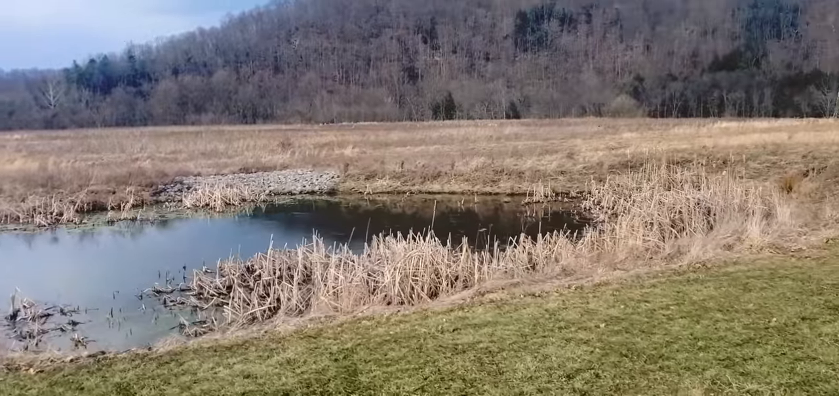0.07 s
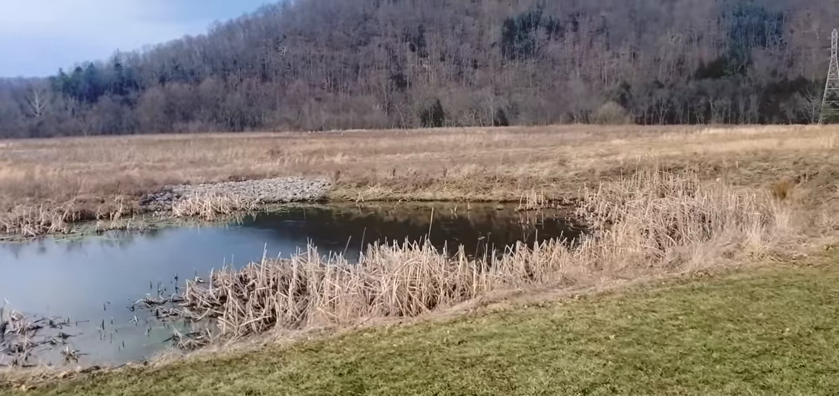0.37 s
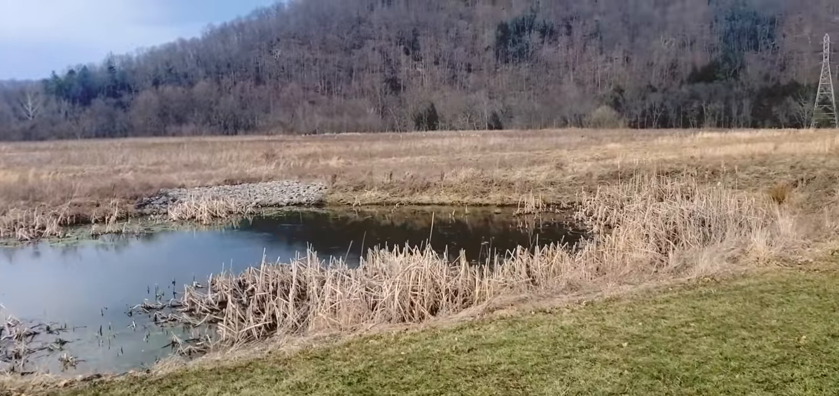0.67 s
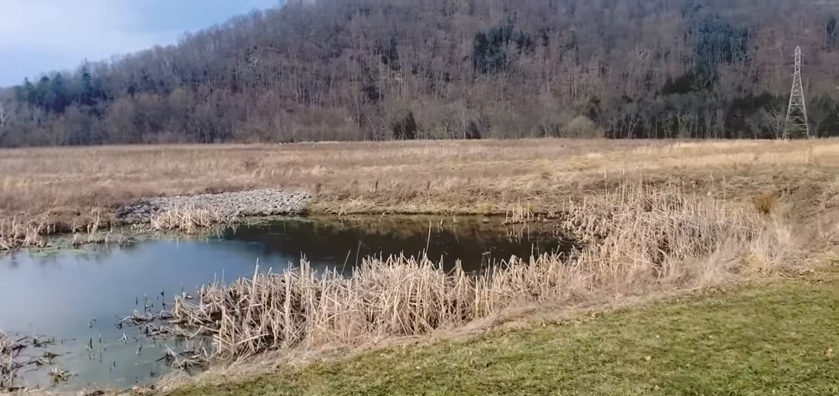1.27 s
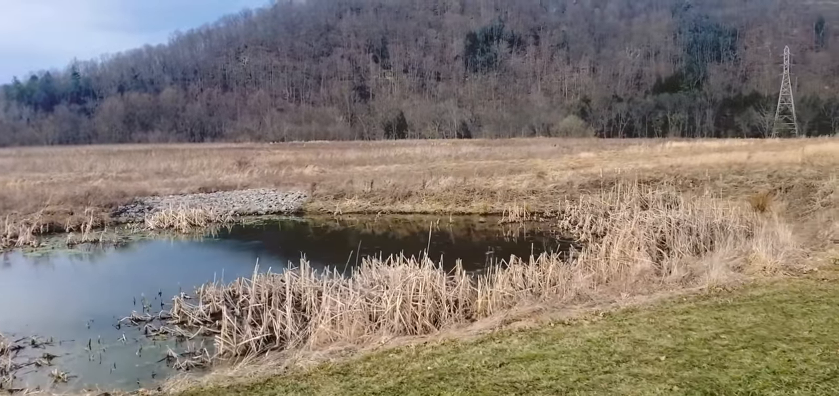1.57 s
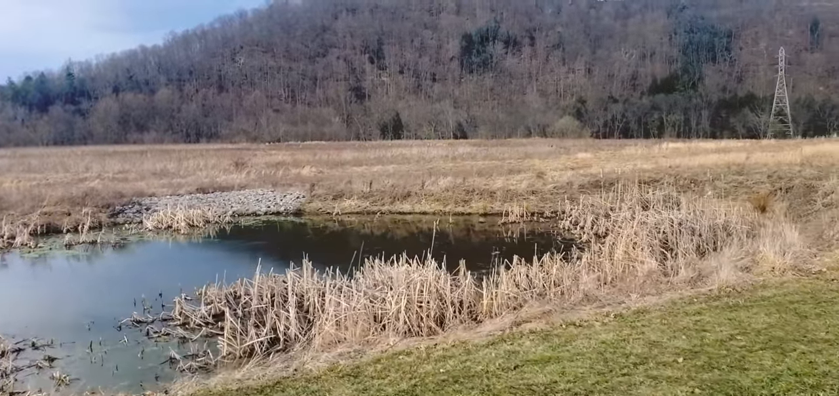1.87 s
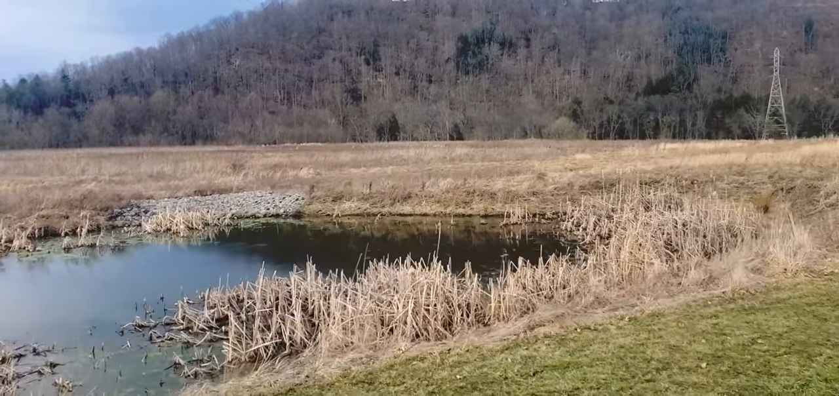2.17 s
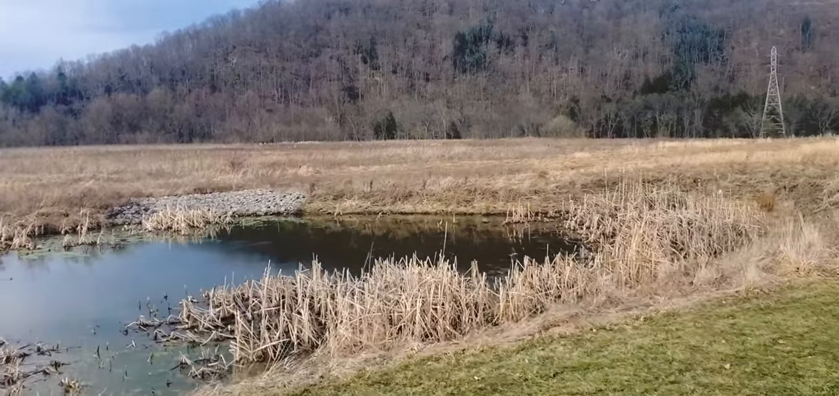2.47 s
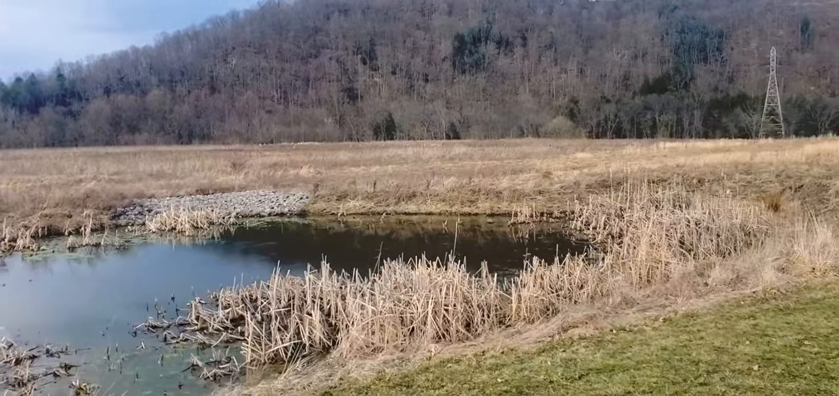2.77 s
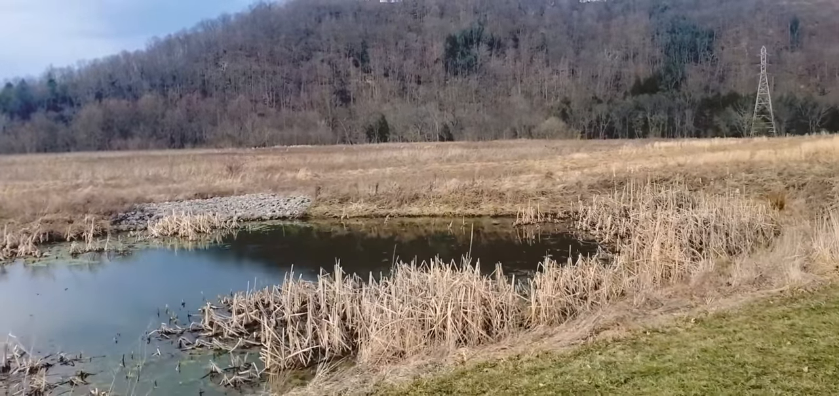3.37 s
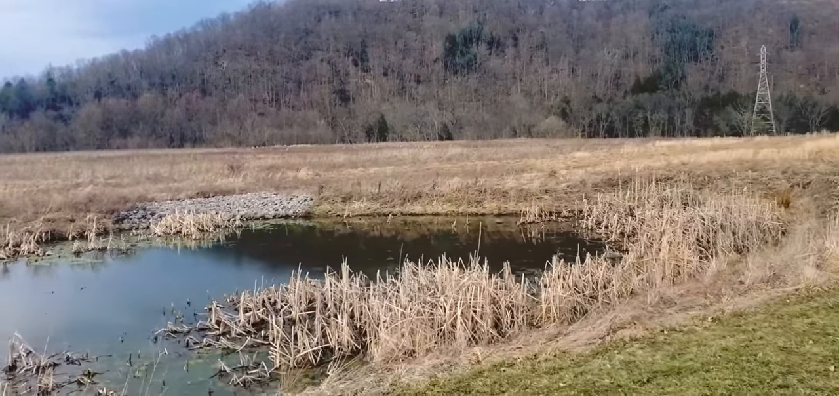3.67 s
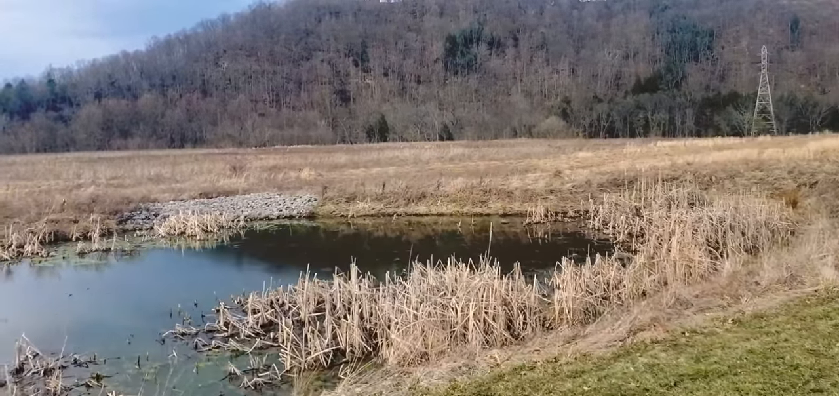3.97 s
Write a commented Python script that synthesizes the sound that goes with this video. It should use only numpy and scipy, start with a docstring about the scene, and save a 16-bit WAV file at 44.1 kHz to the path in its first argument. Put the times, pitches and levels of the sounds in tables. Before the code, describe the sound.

Many small frogs peep throughout around a pond, their short, high, rising whistles overlapping a distant chorus and echoing faintly. Soft, lower frog quacks come now and then. One frog trills briefly at about 0.9 seconds, and the loudest peeps fall around 1.5 to 1.7 seconds. Light wind rumbles on the microphone over a faint hiss, thumping hardest near 2.7 and 3.6 seconds.

```python
"""Spring peepers call round a reedy pond. From the start, rising whistles from the near bank overlap a
distant chorus and wood frogs quack now and then, over a faint hiss that swells and fades and a few dry
ticks. A low-voiced peeper soon joins in, and just before one second one frog gives a short trill.
Light gusts buffet the microphone throughout and thump hardest in the second half.
Every call scatters off the reeds and echoes faintly from a wooded hill."""
import sys
import numpy as np
from scipy import signal
from scipy.fft import rfft, irfft
from scipy.io import wavfile
from scipy.ndimage import map_coordinates

SR = 44100
rng = np.random.default_rng(int(sys.argv[2]) if len(sys.argv) > 2 else 0)


def to_wav(s):
    """Save 16-bit WAV."""
    ch = np.atleast_2d(s).T  # columns
    pcm = np.round(np.clip(ch, -1, 1) * 32767)  # PCM
    wavfile.write(sys.argv[1], SR, pcm.astype(np.int16))


N = 176400  # 4 seconds
PEEP_PAN_DB = 2.5  # the peepers are louder on the left


def undb(db):
    """Turn decibels into a number to multiply a sound by."""
    return 10 ** (np.asarray(db) / 20)


def unit(x):
    """Scale a sound to an average (rms) level of 1."""
    return x / np.sqrt(np.mean(x ** 2) + 1e-20)


def curve(rows):
    """Loudness over time, drawn through (time_s, level_db) points."""
    return undb(np.interp(np.arange(N) / SR, *np.array(rows).T))


def drift(rate_hz, size):
    """A smooth random wobble, mostly between -1 and 1."""
    position = np.arange(size) / SR * rate_hz
    return map_coordinates(rng.standard_normal(512), [position], order=2, mode="wrap")


def add(out, start_s, sound, pan_db=0):
    """Mix a sound into both channels; a positive pan_db makes the left louder."""
    sound = sound * undb(np.array([[pan_db], [-pan_db]]) / 2)
    offset = int(start_s * SR)
    first, end = max(offset, 0), min(offset + sound.shape[1], N)
    if end > first:
        out[:, first:end] += sound[:, first - offset:end - offset]


def noise(colour, width):
    """Stereo noise shaped by (pitch_hz, level_db) points; it falls away steeply beyond them."""
    hz, db = np.array(colour, float).T
    log_hz = np.log(np.arange(N // 2 + 1) * SR / N + 1e-3)
    beyond = np.abs(log_hz - np.clip(log_hz, np.log(hz[0]), np.log(hz[-1])))
    gain = undb(np.interp(log_hz, np.log(hz), db) - 50 * beyond)
    middle, side = (unit(irfft(rfft(rng.standard_normal(N)) * gain, N)) for _ in range(2))
    return middle + width * side * np.array([[1], [-1]])


def noise_band(size, pitch_hz, width_hz):
    """Stereo noise passed twice through a filter that favours one pitch."""
    peak = signal.iirpeak(pitch_hz, pitch_hz / width_hz, fs=SR)
    return signal.lfilter(*peak, signal.lfilter(*peak, rng.standard_normal((2, size))))


def scatter(sound, fade_s, width):
    """A dense cloud of echoes that dies away by 60 dB in fade_s."""
    t = np.arange(SR) / SR
    build_up = 1 - np.exp(-t / 0.0059)
    middle, side = rng.standard_normal((2, SR)) * np.exp(-np.log(1000) * t / fade_s) * build_up
    tail = unit(middle + width * side * np.array([[1], [-1]])) / np.sqrt(SR)
    return signal.fftconvolve(sound.mean(0)[None], tail, axes=1)[:, :N]


def open_air():
    """A soft rush of air, a faint hiss and a higher sheen, each swelling and fading."""
    # tone of each layer: pitch_hz, level_db
    air_colour = [(120,-16),(260,-3.5),(420,-2),(600,0.5),(960,-6.5),(1250,-2.5),(1650,-5.5),(2000,-11),(2600,-1.5)]
    hiss_colour = [(1800,7.5),(3200,4),(3700,3.5),(4400,1.5),(7000,0.5),(8200,-15.5)]
    sheen_colour = [(7500,-1.5),(9000,-6),(11500,-2),(13500,-2.5),(15500,2.5)]
    # rise and fall of each layer: time_s, level_db
    air_level = [(0,-58.5),(.45,-60),(.9,-58),(1.3,-60),(1.5,-61.5),(1.62,-67),(1.85,-57.5),(2.15,-57.5),(2.45,-61),(2.8,-64),(3.1,-62),(3.35,-62),(3.6,-64.5),(4,-64)]
    hiss_level = [(0.0, -73), (0.13, -73.5), (0.31, -70), (0.33, -75), (0.68, -82), (0.78, -66.5),
                  (0.81, -73.5), (0.96, -64), (1.02, -71), (1.71, -81), (1.9, -74), (2.19, -69),
                  (2.28, -74.5), (2.71, -84), (2.75, -73), (3.1, -71), (3.2, -79.5), (4.0, -72.5)]
    sheen_level = [(0.0, -74), (0.17, -77), (0.28, -71.5), (0.44, -81), (0.69, -83), (0.75, -64),
                   (0.87, -70.5), (0.91, -60), (1.06, -74), (1.49, -77.5), (1.5, -71), (1.54, -80.5),
                   (1.68, -82.5), (2.06, -70.5), (2.7, -82), (2.76, -71.5), (3.29, -79), (4.0, -73.5)]
    out = undb(-1.5 + drift(12, N)) * curve(air_level) * noise(air_colour, width=1)
    hiss = undb(4.5 + 1.83 * drift(25.51, N)) * curve(hiss_level) * noise(hiss_colour, width=0.98)
    sheen = undb(1 + 0.79 * drift(21.23, N)) * curve(sheen_level) * noise(sheen_colour, width=0.98)
    add(out, 0, hiss, pan_db=-4)
    add(out, 0, sheen, pan_db=1)
    return out


def sizzles():
    """Faint, thin bands of noise that fade in and out."""
    # sizzles: start_s, length_s, pitch_hz, level_db
    bands = [(0.604,0.035,4900,-71),(1.749,0.5,4340,-72),(2.262,0.58,5120,-74),(2.279,0.54,3300,-62)]
    out = np.zeros((2, N))
    for start_s, length_s, pitch_hz, level_db in bands:
        size = int(length_s * SR)
        band = noise_band(N, pitch_hz, width_hz=410)[:, :size]
        add(out, start_s, undb(level_db) * unit(band) * signal.windows.tukey(size))
    return out


def ticks():
    """Dry snaps of noise that die within a few milliseconds."""
    # ticks: start_s, pitch_hz, width_hz, level_db
    snaps = [(0.313,1100,2200,-39.5),(.313,4970,3000,-52),(.365,8900,9000,-55.5),(0.415,6900,4000,-60),(1.503,11600,4970,-52.5),(2.507,10000,5000,-59.5),(2.817,4600,2000,-53),(3.399,11000,7000,-63),(3.467,7040,2800,-52),(3.486,13800,4020,-65),(3.5,6540,4000,-53)]
    out = np.zeros((2, N))
    t = np.arange(SR // 30) / SR
    fade = np.exp(-t / 0.0018)
    for start_s, pitch_hz, width_hz, level_db in snaps:
        add(out, start_s, undb(level_db) * fade * unit(noise_band(len(t), pitch_hz, width_hz)))
    return out


def wind():
    """Wind on the microphone: a deep rumble, a flutter above it and single swirls of air that thump."""
    # tone of each layer: pitch_hz, level_db
    rumble_colour = [(12, -31), (20, -9.5), (51, 6), (71, 4), (89, 1.5), (152, -15.5), (300, -37),
                     (390, -60), (660, -120)]
    flutter_colour = [(70,-17),(115,10),(180,2.5),(290,-5.5),(420,-15),(800,-25.5),(1500,-47)]
    # rise and fall of the gusts: time_s, level_db
    rumble_level = [(0,-45.5),(.55,-47),(.95,-41.5),(1.12,-43.5),(1.28,-35),(1.42,-44),(1.56,-39.5),(1.8,-45.5),(2.05,-35.5),(2.25,-44.5),(2.45,-40.5),(2.75,-42.5),(2.98,-38),(3.2,-40),(3.32,-49),(3.47,-33.5),(3.54,-40),(3.7,-37.5),(4.0,-41)]
    flutter_level = [(0,-61.5),(.62,-64.5),(.85,-54),(1.1,-61.5),(1.3,-52),(1.5,-52),(1.62,-54.5),(1.75,-67.5),(2.05,-48.5),(2.2,-53),(2.45,-48.5),(2.86,-44.5),(2.92,-49),(3.0,-46.5),(3.13,-55),(3.39,-58),(3.55,-46.5),(3.63,-41.5),(3.85,-45),(4.0,-48)]
    # swirls hitting the microphone: start_s, length_s, pitch_hz, level_db
    swirls = [(0.394,.05,44.7,-29),(.90,0.077,62,-30),(1.21,.06,58,-26.5),(1.265,0.076,104.6,-30),(1.97,0.039,124,-33),(2.055,0.056,110.6,-27.5),(2.425,0.044,270,-41),(2.555,0.043,130,-32.5),(2.595,0.047,237.3,-39.5),(2.69,0.039,62.8,-17.5),(2.79,0.067,90.3,-26.5),(2.825,0.049,249.3,-35),(2.835,0.051,94.4,-27.5),(2.965,0.057,158.7,-33),(2.968,0.049,561,-42.5),(3.58,0.046,122,-25.5),(3.62,0.045,75,-17.5),(3.615,0.071,267,-38),(3.67,0.077,230.7,-35),(3.685,0.054,98.3,-22.5),(3.77,0.075,259,-33.5)]
    out = undb(1) * curve(rumble_level) * noise(rumble_colour, width=0.72)
    out += undb(-2.5 + 4.1 * drift(30, N)) * curve(flutter_level) * noise(flutter_colour, width=1.45)
    for start_s, length_s, pitch_hz, level_db in swirls:
        size = int(length_s * SR)
        hz = pitch_hz * (1 + 0.22 * drift(pitch_hz, size))
        phase = 2 * np.pi * np.cumsum(hz) / SR
        lead_rad = drift(44, size) * np.array([[1], [-1]])  # left and right slip out of step
        thump = undb(level_db) * np.hanning(size) * np.sin(phase + lead_rad)
        add(out, start_s, thump, pan_db=2 * rng.standard_normal())
    return out


def whistle(hz, swell_db=0):
    """A peeper's voice: an almost pure tone that follows a pitch curve and wavers a little."""
    fade_in_s, fade_out_s = 0.023, 0.043
    size = len(hz)
    t = np.arange(size) / SR
    fade_in = np.sin(np.pi / 2 * np.minimum(t / fade_in_s, 1)) ** 2
    fade_out = np.sin(np.pi / 2 * np.minimum(t[::-1] / fade_out_s, 1))
    lead_rad = 0.44 + 0.39 * rng.standard_normal()  # the wave usually reaches the left side first
    wavering_hz = hz * (1 + 0.0023 * drift(61, size))
    phase = 2 * np.pi * np.cumsum(wavering_hz) / SR + np.array([[lead_rad], [0]])
    level_db = swell_db * np.linspace(-.5, .5, size) + 2 * drift(55.3, size)
    return fade_in * fade_out * undb(level_db) * np.sin(phase)


def peep(length_s, from_hz, to_hz):
    """One whistle that slides between two pitches, more slowly towards its end."""
    progress = np.linspace(0, 1, int(length_s * SR))
    slide = progress + 0.199 * progress * (1 - progress)
    return whistle(from_hz + (to_hz - from_hz) * slide)


def far_chorus():
    """Many distant peepers giving rising whistles at random."""
    calls_per_s, rise_hz, level_db = 26, 291.5, -57
    out = np.zeros((2, N))
    for k in range(int(calls_per_s * (N / SR + .2))):
        timing, pitch, length, loudness = rng.uniform(-1, 1, 4)
        hz = 2600 + 190 * pitch
        call = undb(1.7 * loudness) * peep(.14 + 0.0416 * length, hz, hz + rise_hz)
        add(out, (k + timing) / calls_per_s - .15, call, PEEP_PAN_DB)
    return undb(level_db) * unit(out)


def quack(length_s, pitch_hz, throat_hz):
    """A short, rough note that rises and falls; the throat favours overtones near throat_hz."""
    throat_width_hz, roughness_db = 275, 4
    size = int(length_s * SR)
    arch = np.sin(np.pi * np.linspace(0, 1, size) ** 0.85)
    hz = pitch_hz * (1 + 0.1 * (arch - 1) + 0.047 * drift(336, size))
    phase = 2 * np.pi * np.cumsum(hz) / SR
    voice = undb(-16) * np.sin(2 * phase)  # the body gives off a tone at twice the pitch
    for k in range(1, 8):
        throat = (1 + ((k * hz - throat_hz) / throat_width_hz) ** 2) ** -2
        voice += throat * undb(roughness_db * drift(262, size)) * np.sin(k * phase)
    return unit(voice * arch ** 2)


def wood_frogs():
    """Single quacks from deep in the reeds, blurred by quick echoes."""
    # quacks: start_s, length_s, pitch_hz, throat_hz, level_db, pan_db
    calls = [(0.131,0.028,341.5,1390,-48,6.5),(0.548,0.037,386,1350,-50,3),(0.61,0.042,407.5,1845,-52.5,13),(0.63,0.025,380,1360,-48,2),(1.096,0.058,308,1230,-53.5,8),(1.403,0.022,354,1380,-62,-7),(1.433,0.03,318.7,1276,-48,5),
             (1.793,0.037,365.6,1520,-58.5,-8),(2.279,0.023,385,1465,-49,4),(2.347,0.046,377,1307,-46.5,4),(2.602,0.022,371.5,1065,-49,0),(2.958,0.043,369.3,1440,-51,0),(3.014,.04,365,1450,-65,4),
             (3.25,0.023,317,1250,-47.5,9.5),(3.575,.036,396.6,1480,-51,4)]
    out = np.zeros((2, N))
    for start_s, length_s, pitch_hz, throat_hz, level_db, pan_db in calls:
        add(out, start_s, undb(level_db) * quack(length_s, pitch_hz, throat_hz), pan_db)
    return out + undb(-4.5) * scatter(out, fade_s=0.11, width=1.6)


def low_peeper():
    """Long, low whistles that sag into the note, then climb and grow louder."""
    # low whistles: start_s, length_s, low_hz, end_hz, level_db
    calls = [(0.66,.17,2310,2380,-56),(0.808,0.18,2256,2430,-55.5),(1.653,0.25,2297,2427,-45),(2.749,0.23,2285,2410,-56),(2.921,.16,2170,2300,-61.5),(3.883,.17,2280,2370,-55.5)]
    sag_hz, sag_s = 70.6, 0.02
    out = np.zeros((2, N))
    for start_s, length_s, low_hz, end_hz, level_db in calls:
        t = np.arange(int(length_s * SR)) / SR
        hz = low_hz + sag_hz * np.exp(-t / sag_s) + (end_hz - low_hz) * (t / length_s) ** 2
        add(out, start_s, undb(level_db) * whistle(hz, swell_db=11.5), PEEP_PAN_DB)
    return out


def trilling_peeper():
    """A run of quick pulses: each one slides down, while the whole run climbs and fades."""
    start_s, spacing_s, climb_hz_per_s, fade_db_per_s = 0.858, 0.036, 390, 14
    out = np.zeros((2, N))
    for k in range(11):
        t = k * spacing_s + 0.0013 * rng.standard_normal()
        hz = 2163 + climb_hz_per_s * t
        level_db = -51 - fade_db_per_s * t + 2 * rng.standard_normal()
        add(out, start_s + t, undb(level_db) * peep(length_s=0.042, from_hz=hz + 45, to_hz=hz - 45))
    return out


def near_peepers():
    """Rising whistles from close by, each with two echoes from the banks."""
    # near whistles: start_s, length_s, from_hz, to_hz, level_db
    calls = [(-0.05, 0.091, 2833, 3043, -48.5), (0.092, 0.11, 2460, 2670, -48),
             (0.092, 0.11, 2570, 2774, -56), (0.096, 0.1, 2746, 3150, -46), (0.153, 0.1, 2740, 3060, -53),
             (0.157, 0.19, 2625, 2934, -52.5), (0.172, 0.17, 2473, 2812, -50.5),
             (0.203, 0.1, 2350, 2584, -55.5), (0.319, 0.23, 2644, 3028, -52.0),
             (0.391, 0.14, 2577, 2874, -53), (0.476, 0.11, 2533, 2733, -50.5),
             (0.562, 0.15, 2485, 2683, -57), (0.608, 0.12, 2466, 2763, -47),
             (0.65, 0.15, 2746, 3004, -45.5), (0.793, 0.14, 2510, 2870, -53),
             (0.803, 0.12, 2776, 3124, -50), (0.829, 0.26, 2350, 2817, -56.5),
             (0.855, 0.075, 2915, 3077, -46), (0.95, 0.094, 2450, 2752, -42.5),
             (0.966, 0.1, 2870, 3150, -48.5), (0.98, 0.077, 2480, 2590, -44.5),
             (1.1, 0.13, 2640, 3064, -52.5), (1.118, 0.13, 2650, 2973, -55), (1.252, 0.17, 2420, 2786, -50),
             (1.263, 0.12, 2715, 2990, -49), (1.34, 0.2, 2600, 3060, -49), (1.411, 0.14, 2633, 2997, -52.5),
             (1.517, 0.11, 2457, 2770, -40.5), (1.521, 0.19, 2320, 2620, -49),
             (1.572, 0.14, 2800, 3083, -44), (1.697, 0.089, 2470, 2720, -37),
             (1.744, 0.1, 2760, 3117, -43.5), (1.78, 0.12, 2396, 2656, -47.5),
             (1.841, 0.076, 2840, 3120, -44.5), (1.867, 0.11, 2760, 3086, -52.5),
             (1.95, 0.12, 2360, 2646, -49), (1.965, 0.19, 2505, 2856, -50), (2.006, 0.12, 2856, 3067, -55),
             (2.118, 0.2, 2373, 2930, -43), (2.29, 0.18, 2560, 2880, -56.5),
             (2.368, 0.17, 2454, 2792, -49.5), (2.458, 0.12, 2428, 2760, -50), (2.5, 0.16, 2912, 3055, -55),
             (2.567, 0.093, 2510, 2780, -51.5), (2.609, 0.11, 2480, 2690, -49.5),
             (2.656, 0.11, 2770, 3020, -54), (2.716, 0.092, 2472, 2760, -44),
             (2.77, 0.17, 2320, 2677, -52.5), (2.823, 0.11, 2464, 2752, -49.5),
             (2.888, 0.077, 2780, 3090, -54.5), (2.913, 0.12, 2736, 3074, -50.0),
             (3.024, 0.1, 2405, 2682, -41), (3.03, 0.14, 2620, 3030, -55), (3.062, 0.13, 2552, 2796, -47.5),
             (3.189, 0.16, 2463, 2827, -55), (3.21, 0.12, 2770, 3008, -45.5), (3.27, 0.12, 2605, 2820, -44),
             (3.371, 0.17, 2686, 3098, -54), (3.369, 0.24, 2495, 2907, -58), (3.377, 0.12, 2780, 3010, -47),
             (3.609, 0.14, 2380, 2630, -61), (3.681, 0.12, 2412, 2780, -44.0),
             (3.717, 0.11, 2786, 3153, -46), (3.721, 0.11, 2520, 2756, -45),
             (3.873, 0.14, 2453, 2812, -41.5), (3.9, 0.12, 2390, 2666, -48.5),
             (3.909, 0.11, 2790, 3080, -45)]
    bank_echoes = [(0.018, -10.5), (0.038, -16.5)]  # typical_delay_s, echo_db
    out = np.zeros((2, N))
    for start_s, length_s, from_hz, to_hz, level_db in calls:
        call = undb(level_db + 1.5) * peep(length_s, from_hz, to_hz)
        add(out, start_s, call, PEEP_PAN_DB)
        for typical_delay_s, echo_db in bank_echoes:
            delay_s = typical_delay_s * (1 + 0.8 * (rng.random() - .5))
            add(out, start_s + delay_s, undb(echo_db) * call, PEEP_PAN_DB + 2 * rng.standard_normal())
    return out


def scene():
    """The frogs and their echoes from the reeds and the hill, over wind and faint background noise."""
    frogs = near_peepers() + trilling_peeper() + low_peeper() + far_chorus() + wood_frogs()
    reed_echo = undb(-14.5) * scatter(frogs, fade_s=0.25, width=0.46)
    hill_echo = undb(-25) * scatter(frogs, fade_s=0.66, width=1)
    return frogs + reed_echo + hill_echo + wind() + open_air() + sizzles() + ticks()


def record(dry):
    """Cut away the very highest treble."""
    top_hz = 15850
    return signal.sosfilt(signal.ellip(10, .2, 70, top_hz, fs=SR, output="sos"), dry)


dry = scene()
out = record(dry)
to_wav(out)
```